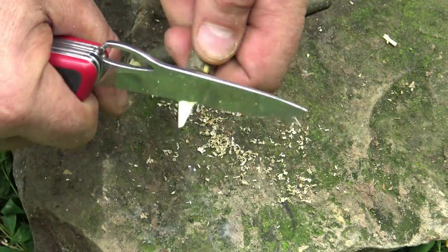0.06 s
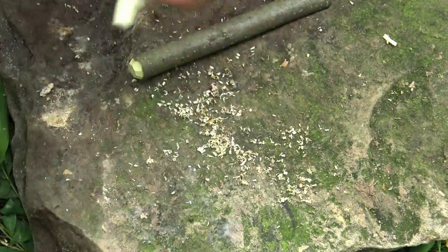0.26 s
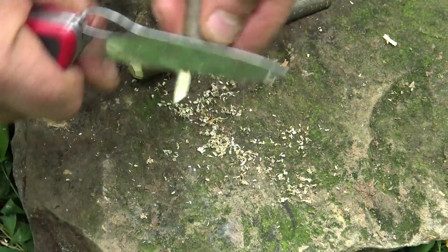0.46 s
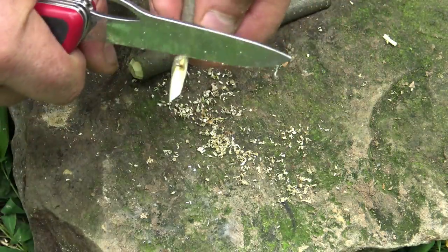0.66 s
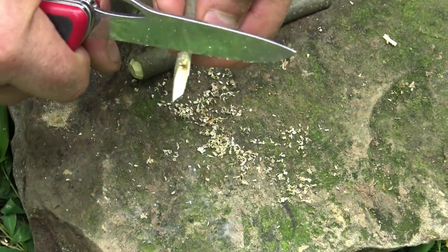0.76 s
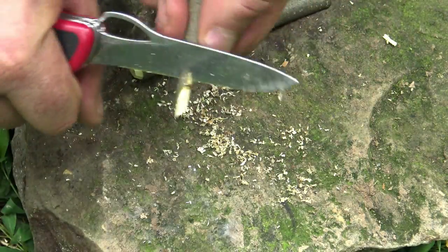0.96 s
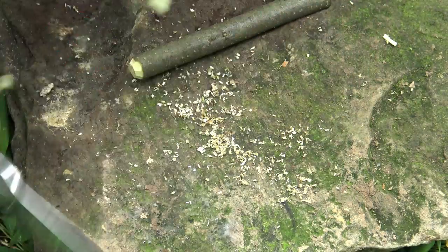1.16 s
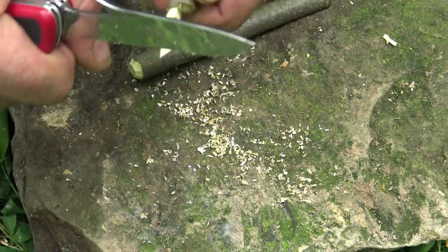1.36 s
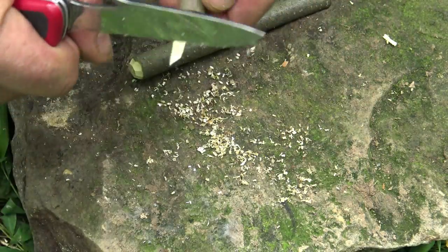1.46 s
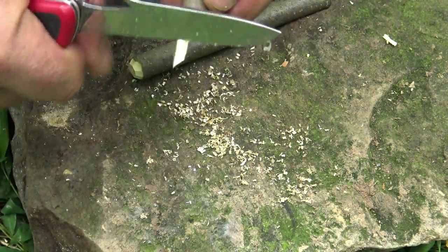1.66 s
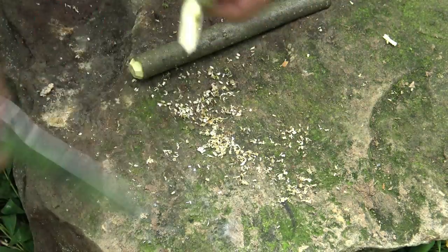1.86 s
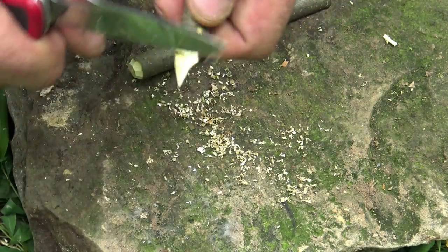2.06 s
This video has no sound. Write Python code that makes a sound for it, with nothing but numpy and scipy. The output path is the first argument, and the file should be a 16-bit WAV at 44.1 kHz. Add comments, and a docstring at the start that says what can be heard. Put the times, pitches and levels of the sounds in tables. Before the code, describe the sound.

Knife blade snaps crisply through green wood, chips ticking on stone in quiet woodland

```python
"""Woodland: a pocket knife whittles a point on a green stick, close to the microphone.
Noise shaped in time and spectrum gives the edge's hiss, the snapping and crackling fibres and the chips
ticking on a stone; a resonant filter sounds the stick, decaying sines and one short ping the freed blade.
Convolution with fading noise gives the soft tail of the trees. Hands and sleeves rub; behind lie
a low rumble, a thin insect tone, far birds and one faint high whistle, made of filtered noise."""
import sys
import numpy as np
from scipy import signal
from scipy.fft import rfft, irfft
from scipy.io import wavfile
from scipy.ndimage import uniform_filter1d

SR = 44100
rng = np.random.default_rng(int(sys.argv[2]) if len(sys.argv) > 2 else 0)


def to_wav(sig):
    """Store sig (one row per channel, or 1-D mono) as 16-bit WAV at the path in sys.argv[1].

    Samples outside -1..1 are clipped; the rate is SR.
    """
    pcm = np.clip(np.atleast_2d(sig), -1, 1) * 32767
    pcm = np.round(pcm).astype(np.int16)
    wavfile.write(sys.argv[1], SR, pcm.T)  # frames by channels


N = 92610  # samples, 2.1 s
GRAIN_DB = 2.5  # spread of force among tiny fractures

# Spectrum of a small piece of dry wood. Each row: frequency in Hz, relative level in dB.
CHIP_SPECTRUM = [(300, 1.5), (1500, -8.5), (3500, 2.5), (6000, 1.5), (9000, 2), (11000, -6), (16000, -20)]


def amp(db):
    """Level law: 20 dB is a factor of ten in amplitude."""
    return 10 ** (np.asarray(db) / 20)


def evened(x):
    """Normalization: scales a signal to a root mean square of 1."""
    return x / np.sqrt(np.mean(x ** 2) + 1e-30)


def read(points, hz):
    """Interpolation of a curve along a logarithmic frequency axis."""
    point_hz, value = np.transpose(points)
    return np.interp(np.log(hz + 1), np.log(point_hz + 1), value)


def add(mix, s, sound):
    """Superposition: adds a sound to the mix, in place, at s seconds."""
    part = mix[max(round(s * SR), 0):][:len(sound)]
    part += sound[:len(part)]


def colour(x, points, tilt=0, size=4096):
    """Minimum-phase filtering: a causal response with the given spectrum, tilted in dB per octave."""
    hz = abs(np.fft.fftfreq(size, 1 / SR))
    log_gain = np.log(amp(read(points, hz) + tilt * np.log2(hz + 20)))
    # the Hilbert transform of the log gain supplies the phase
    spectrum = np.exp(np.conj(signal.hilbert(log_gain)))
    taps = np.fft.ifft(spectrum).real
    return signal.fftconvolve(x, taps[:size // 2])[:len(x)]


def resonate(x, hz, width):
    """Resonance by heterodyning: shift down, smooth by two poles of this width in Hz, shift back up."""
    phase = 2 * np.pi * np.cumsum(hz * np.ones(len(x))) / SR  # the pitch may be a curve
    turn = np.exp(1j * phase)
    r = np.exp(-np.pi * width / SR)
    smoothed = signal.lfilter([(1 - r) ** 2], [1, -2 * r, r * r], x / turn + 1e-18)
    return (turn * smoothed).real


def swell(t, rise, fall):
    """Exponential growth up to time zero, then exponential decay, with time constants in seconds."""
    return np.exp(-np.maximum(-t / rise, t / fall))


def grains(count, spread_db):
    """Random superposition of dense tiny fractures of uneven size."""
    unevenness = np.clip(rng.standard_normal(count), -2, 2)
    return rng.standard_normal(count) * amp(spread_db * unevenness)


def blow(x, db):
    """Impulse energy: the level in dB is that of the total energy spread over 5 ms."""
    return amp(db) * x * np.sqrt(.005 * SR / (np.sum(x ** 2) + 1e-30))


def burst(rise, fall, size=4096):
    """Broadband excitation: a cascade of fractures around time zero; returns times and force."""
    even_share = .72  # 0 leaves the spectrum alone, 1 makes it flat
    t = (np.arange(size) - size // 8) / SR
    shape = swell(t, rise, fall)
    spectrum = rfft(shape * grains(size, GRAIN_DB))
    flattened = irfft(spectrum / (abs(spectrum) + 1e-9) ** even_share)
    gate = np.minimum(2 * np.sqrt(shape), 1)  # flattening smears time, so confine it again
    return t, flattened * gate


def snaps():
    """Impulsive excitation: each fibre snap shakes hand and stick, squeaks and rings the blade's modes."""
    # Snapping fibres. Each row: time in seconds, rise and fall constants in seconds, thud level in dB,
    # stick knock pitch in Hz and level in dB, crack level in dB, squeak pitch in Hz and level in dB,
    # blade ring level in dB.
    snap_rows = [(.217, 0.000018, 0.0021, -31, 1148, -15.5, -12, 8100, -35, -52),
                 (0.2256, 0.00022, 0.0023, -26, 1177, -20.5, -15, 9100, -44, -28),
                 (0.8592, 0.0041, 0.0072, -54, 1080, -41, -43.5, 4200, -54, -68),
                 (1.0449, 0.000067, .0026, -29, 1020, -31.5, -31, 5030, -29.5, -65),
                 (1.0808, 0.00052, .0008, -30.5, 1144, -29, -21.5, 5100, -18, -70),
                 (1.0825, 0.0018, 0.0033, -38, 1170, -66, -25, 4250, -39, -70),
                 (1.6027, .0005, .002, -59, 1044, -43, -69, 5030, -61, -78.5),
                 (1.7414, 0.0018, 0.0046, -37.5, 1066, -18.5, -24, 7940, -31, -50),
                 (1.745, 0.0012, 0.0018, -39, 1120, -70, -20, 8520, -25, -28)]
    # Spectra of hand thud and wood crack. Each row: frequency in Hz, relative level in dB.
    thud_spectrum = [(40, -17), (150, -17.5), (450, -7.5), (580, -8), (740, -16), (2000, -29.5)]
    crack_spectrum = [(300, -21), (750, -11), (1400, -24), (1900, -7), (2270, 2.5), (2750, -4), (3100, 0.5),
                      (3480, -6), (3750, 1.5), (4250, 3.5), (4550, -8.5), (7000, 0.5), (9200, 1),
                      (10000, -12), (13000, -6.5), (16000, -17)]
    # Response around the stick's bending modes. Each row: multiple of knock pitch, relative level in dB.
    knock_modes = [(.68, -20), (.89, -1), (1, -3.5), (1.12, 3), (1.42, -17), (3, -57)]
    # Modes of the blade: frequencies in Hz.
    blade_hz = [11450, 14960, 15150]
    # Ringing of those modes. Each row: relative level in dB, time to fall by 60 dB in seconds.
    blade_rings = [(5, .028), (1, .055), (-2, .025)]
    squeak_width_hz = 700

    out = np.zeros(N)
    for s, rise, fall, thud_db, knock_hz, knock_db, crack_db, squeak_hz, squeak_db, ring_db in snap_rows:
        t, force = burst(rise, fall)
        hand = blow(colour(force, thud_spectrum), thud_db)

        impulse = np.where(t == 0, 1., 0)
        knock = colour(impulse, [(knock_hz * ratio, db) for ratio, db in knock_modes])
        crack = colour(force, crack_spectrum)
        wood = blow(knock, knock_db) + blow(crack, crack_db)

        after = np.maximum(t, 0)
        ring = np.zeros(len(t))
        for hz, (db, t60) in zip(blade_hz, blade_rings):
            ring += amp(db - 60 * after / t60) * np.sin(2 * np.pi * hz * after)
        squeak = resonate(force, squeak_hz, squeak_width_hz)
        steel = blow(squeak, squeak_db) + blow(ring, ring_db)
        add(out, s + t[0], hand + wood + steel)
    return out


def slices():
    """Friction noise: the edge catches unevenly on wet wood, so its hiss is grainy."""
    # Strokes of the edge through bark. Each row: peak time in seconds, rise and fall constants
    # in seconds, level in dB.
    strokes = [(0.173, 0.019, 0.046, -39), (.872, .01, 0.051, -54), (1.11, 0.036, 0.087, -45),
               (1.732, 0.013, 0.064, -41)]
    # Spectrum of the hiss. Each row: frequency in Hz, relative level in dB.
    hiss_spectrum = [(1000, -25), (6800, -9.5), (8400, 7), (9600, -7), (11000, -15.5), (16000, -7)]
    grain_db = 5  # rms level fluctuation before filtering

    t = np.arange(N) / SR
    pressure = sum(amp(db) * swell(t - s, rise, fall) for s, rise, fall, db in strokes)
    catching = amp(grain_db * evened(uniform_filter1d(rng.standard_normal(N), size=30)))
    return pressure * evened(colour(catching * rng.standard_normal(N), hiss_spectrum))


def crackle():
    """Random point process: single fibres part at chance moments while the shaving peels away."""
    # Spells of peeling. Each row: peak time in seconds, rise and fall constants in seconds, level in dB.
    peels = [(.245, 0.0068, 0.053, -49), (.342, 0.012, 0.021, -49), (.875, .012, 0.025, -52.5),
             (1.105, 0.0068, 0.046, -44.5), (1.451, 0.0087, 0.01, -50)]
    fibres_per_s, spread_db = 400, 20  # mean rate, range of strengths

    t = np.arange(N) / SR
    strain = sum(amp(db) * swell(t - s, rise, fall) for s, rise, fall, db in peels)
    parting = rng.random(N) < fibres_per_s / SR
    fibres = parting * rng.choice([-1, 1], N) * amp(spread_db * rng.random(N))
    return strain * evened(colour(fibres, CHIP_SPECTRUM))


def chips_and_ping():
    """Impact sound: small dry ticks of shavings and chips and a ping of the blade, one resonance each."""
    # Shavings tearing free, chips landing and, at 1.091 s, a short high ping of the blade.
    # Each row: time in seconds, fall constant in seconds, tick level in dB, resonance pitch in Hz,
    # resonance level in dB.
    ticks = [(0.1766, 0.0028, -40.5, 8350, -42.5), (0.2013, 0.0041, -35.5, 5460, -42),
             (.2375, 0.0076, -35.5, 9050, -32), (0.2679, 0.0034, -39, 4000, -64),
             (0.5059, 0.001, -42.5, 6360, -64), (1.091, .002, -31, 13200, -33),
             (1.119, 0.0015, -35.5, 3670, -38.5), (1.1359, 0.0077, -38.5, 3520, -41),
             (1.2457, 0.0054, -40.5, 9300, -55), (1.3421, 0.0017, -45, 6800, -51),
             (1.7362, 0.01, -23, 8400, -28.5), (1.759, 0.0065, -38.5, 3600, -39),
             (1.7965, .003, -40.5, 9500, -45), (1.8608, 0.012, -40.5, 3800, -44),
             (1.9008, 0.00059, -33, 4970, -44)]
    rise_share, width_hz = 0.23, 550  # rise as a share of the fall, resonance width

    out = np.zeros(N)
    for s, fall, db, hz, pitch_db in ticks:
        t, force = burst(rise_share * fall, fall)
        tick = blow(colour(force, CHIP_SPECTRUM), db)
        pitch = blow(resonate(force, hz, width_hz), pitch_db)
        add(out, s + t[0], tick + pitch)
    return out


def swishes():
    """Rubbing noise: hands jolt and sleeves move, as swells of filtered noise."""
    # Movements. Each row: peak time in seconds, rise and fall constants in seconds, level in dB,
    # brightness in dB per octave.
    movements = [(.228, .006, 0.038, -37, -18.5), (0.915, 0.022, 0.035, -44, -3.5),
                 (1.12, 0.041, 0.036, -41.5, -10.5), (1.16, 0.043, 0.047, -40, 4),
                 (1.811, 0.02, .049, -44.5, 1.5)]
    # Spectrum before the brightness tilt. Each row: frequency in Hz, relative level in dB.
    rub_spectrum = [(60, -15.5), (350, 2), (800, -5.5), (2000, -10.5), (4000, -17.5), (9000, -36),
                    (16000, -46)]

    t = np.arange(N) / SR
    out = np.zeros(N)
    for s, rise, fall, db, tilt in movements:
        rub = evened(colour(rng.standard_normal(N), rub_spectrum, tilt))
        out += amp(db) * swell(t - s, rise, fall) * rub
    return out


def woods(x):
    """Reverberation: trunks and leaves scatter echoes that fade at a rate set by frequency."""
    # Spectrum of the echoes. Each row: frequency in Hz, relative level in dB.
    echo_spectrum = [(100, 14.5), (1200, -4), (2500, -1), (5000, 0.5), (9000, -3), (15000, -2)]
    # Reverberation time. Each row: frequency in Hz, time to fall by 60 dB in seconds.
    echo_t60 = [(2000, 1.0), (6000, 0.6), (15000, 0.85)]
    tail_db, rise_s = -23, 0.0013  # energy of the tail's response, time constant of its onset

    hz, t, z = signal.stft(grains(SR, GRAIN_DB), SR, nperseg=256)
    fade_db = -60 * t / read(echo_t60, hz)[:, None]
    onset = 1 - np.exp(-t / rise_s)
    tail = signal.istft(z * amp(read(echo_spectrum, hz)[:, None] + fade_db) * onset, SR)[1]
    return amp(tail_db) * signal.fftconvolve(x, tail / np.linalg.norm(tail))[:N]


def wildlife():
    """Narrow-band noise: resonances make a thin wavering insect tone, blurred far birds and a whistle."""
    # Course of the bird calls. Each row: time in seconds, pitch in Hz, level in dB.
    bird_course = [(0, 2790, -49), (.16, 2770, -54.5), (.45, 2420, -59), (.75, 2400, -62.5),
                   (1.05, 2900, -65), (1.2, 2890, -50.5), (1.4, 2850, -56), (2.1, 2900, -84)]
    # A faint high whistle: peak time in seconds, rise and fall constants in seconds, pitch in Hz,
    # level in dB.
    whistle_row = (1.38, .1, .22, 7580, -61)
    bird_width_hz, bird_waver_hz = 280, 30
    insect_hz, insect_width_hz, insect_waver_hz, insect_db = 5706, 310, 25.3, -53

    t = np.arange(N) / SR
    insect_waver, bird_waver = evened(uniform_filter1d(rng.standard_normal((2, N)), size=2500))

    s, hz, db = np.transpose(bird_course)
    pitch = np.interp(t, s, hz) + bird_waver_hz * bird_waver
    birds = amp(np.interp(t, s, db)) * evened(resonate(rng.standard_normal(N), pitch, bird_width_hz))

    s, rise, fall, hz, db = whistle_row
    tone = evened(resonate(rng.standard_normal(N), hz, bird_width_hz))
    whistle = amp(db) * swell(t - s, rise, fall) * tone

    insect_pitch = insect_hz + insect_waver_hz * insect_waver
    insect = evened(resonate(rng.standard_normal(N), insect_pitch, insect_width_hz))
    return birds + whistle + amp(insect_db) * insect


def air():
    """Stationary noise with drifting patches: low outdoor rumble and faint leaf hiss."""
    # Spectral density of the air. Each row: frequency in Hz, relative level in dB per Hz.
    air_spectrum = [(25, -3.5), (55, -7.5), (95, 2.5), (140, -5), (220, -11), (450, -14), (800, -16.5),
                    (1600, -19), (2600, -20), (4500, -25), (7500, -26.5), (10500, -34.5), (16000, -35)]
    # Course of the overall level. Each row: time in seconds, level in dB.
    air_course = [(0, -45.5), (.72, -48), (1, -45.5), (1.55, -46.5), (2.1, -45)]
    patch_db = 0.5  # rms fluctuation over time and frequency

    hz, _, z = signal.stft(rng.standard_normal(N), SR, nperseg=2048)
    across_hz = uniform_filter1d(rng.standard_normal(z.shape), size=24, axis=0)
    patches = evened(uniform_filter1d(across_hz, size=4, axis=1))
    wash = signal.istft(z * amp(read(air_spectrum, hz)[:, None] + patch_db * patches), SR)[1][:N]
    return evened(wash) * amp(np.interp(np.arange(N) / SR, *np.transpose(air_course)))


def scene():
    """Superposition at one microphone, the same in both ears; only the knife's sounds excite the tail."""
    knife = snaps() + chips_and_ping() + slices() + crackle()
    mono = knife + woods(knife) + swishes() + wildlife() + air()
    return np.array([mono, mono])


def record(dry):
    """Overload and band limit: peaks clip at full scale, then a linear-phase low-pass acts."""
    edge_hz = 16000
    clipped = np.clip(dry, -1, 1)
    low_pass = signal.firwin(255, edge_hz, window=("kaiser", 8), fs=SR)
    return signal.oaconvolve(clipped, low_pass[None], "same")


dry = scene()
out = record(dry)
to_wav(out)
```